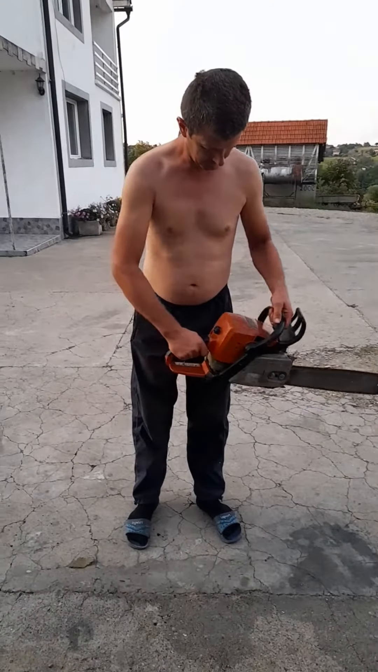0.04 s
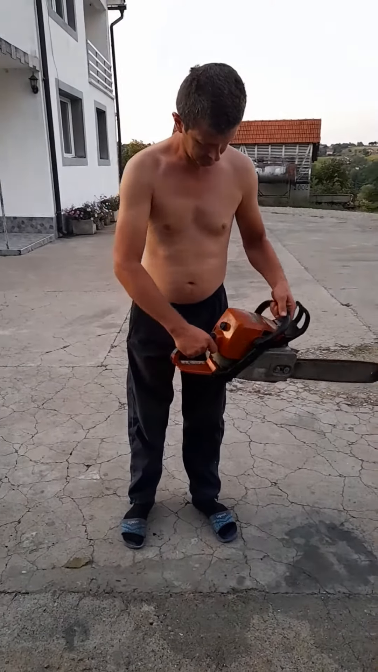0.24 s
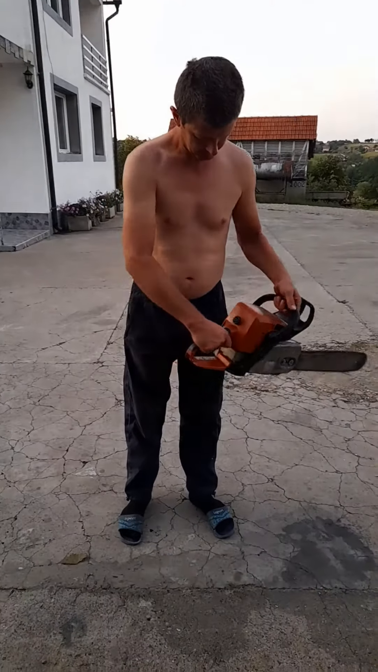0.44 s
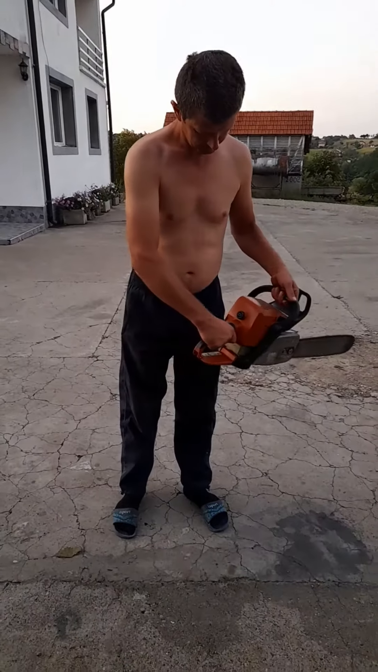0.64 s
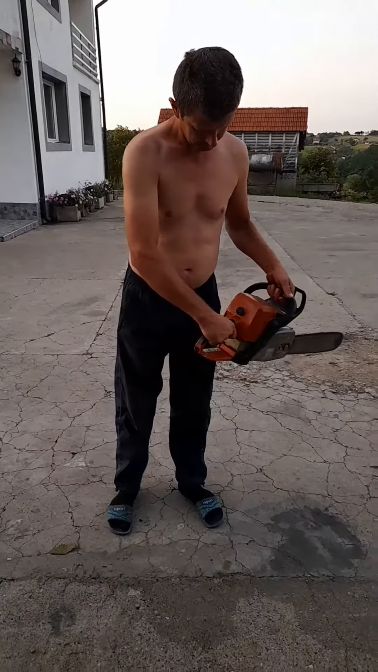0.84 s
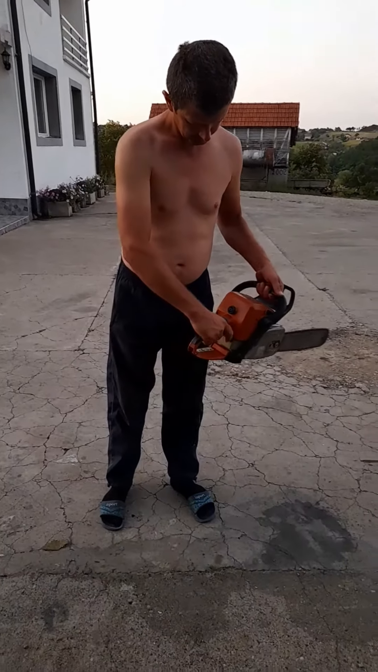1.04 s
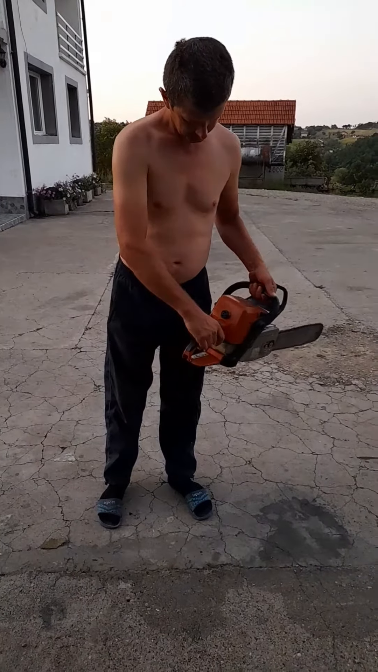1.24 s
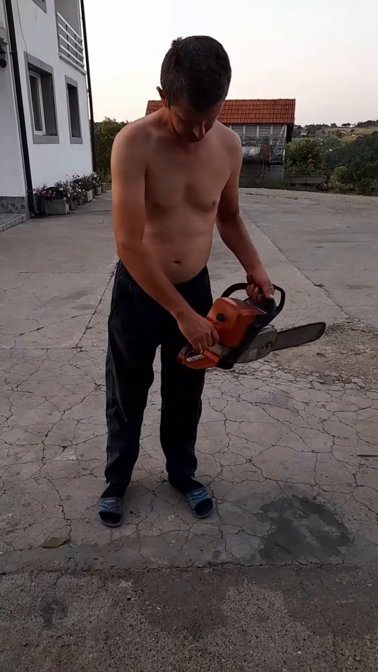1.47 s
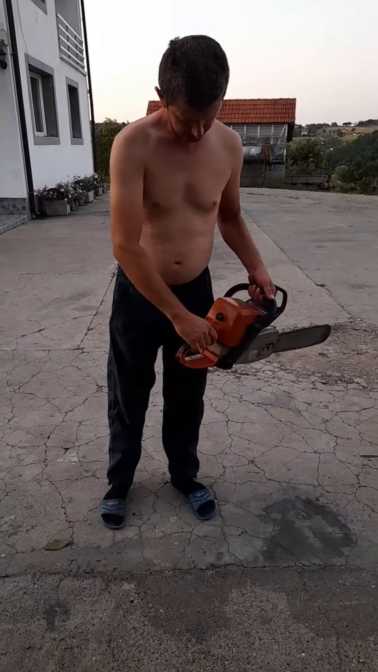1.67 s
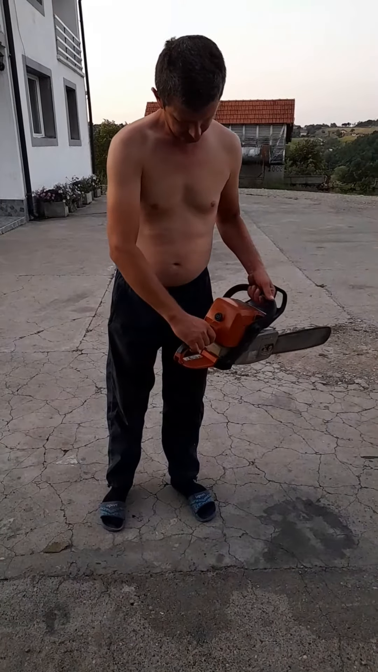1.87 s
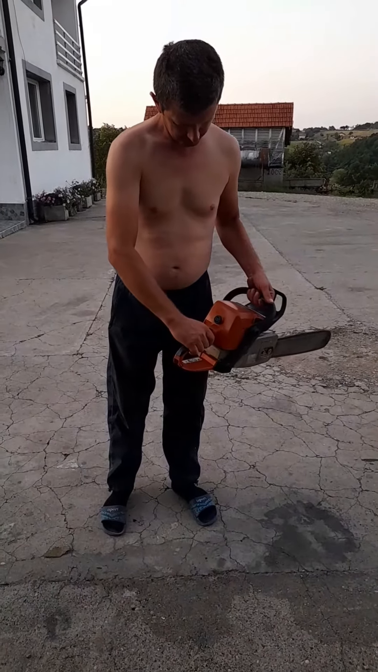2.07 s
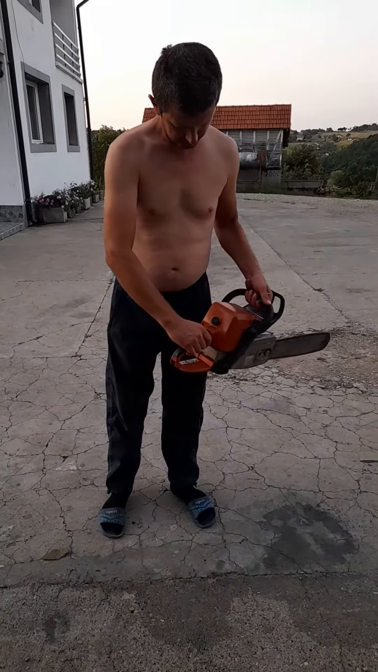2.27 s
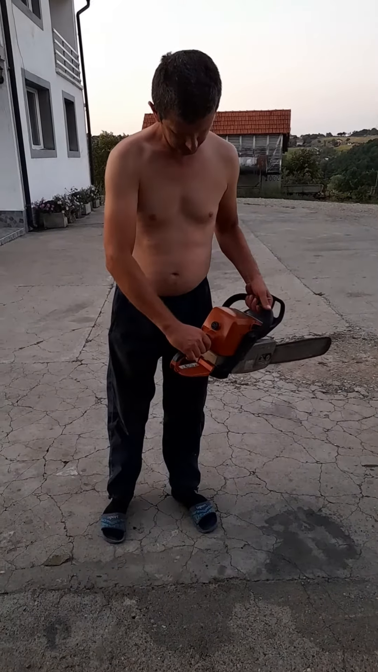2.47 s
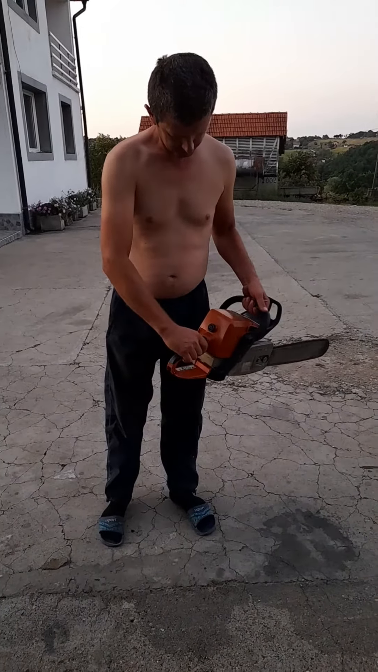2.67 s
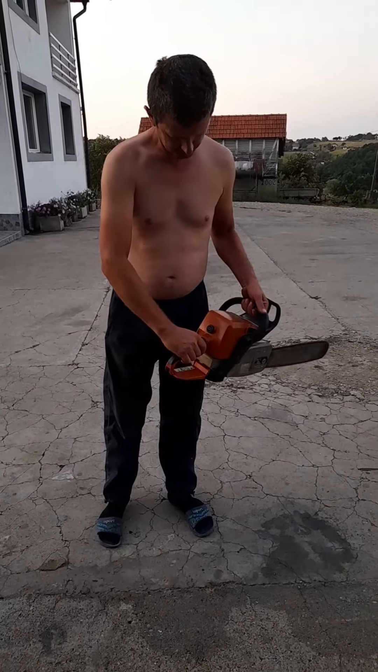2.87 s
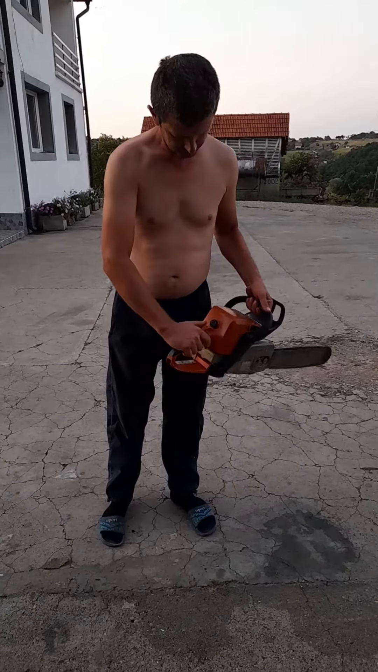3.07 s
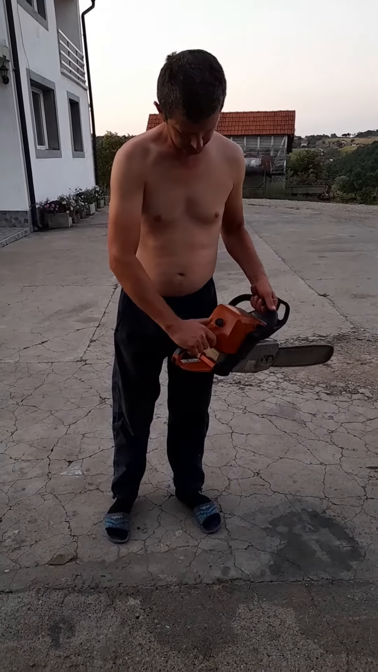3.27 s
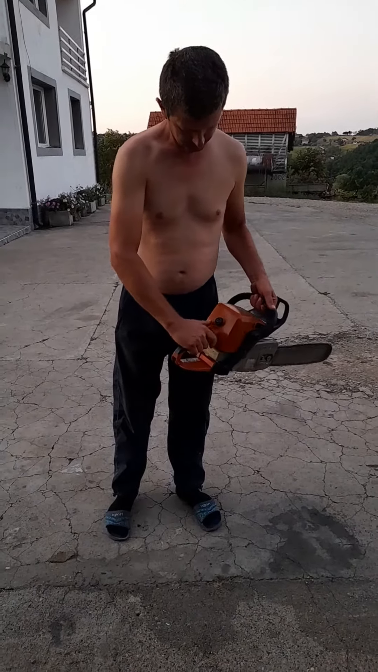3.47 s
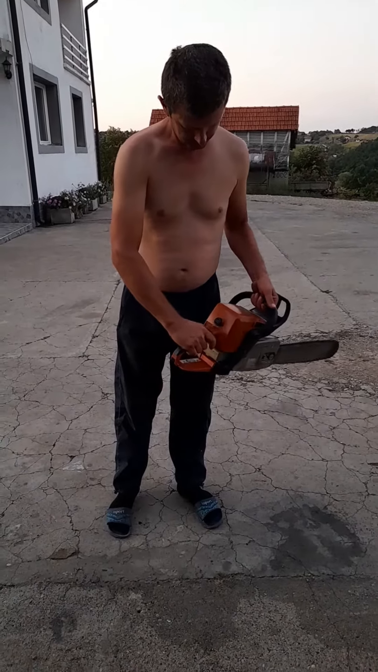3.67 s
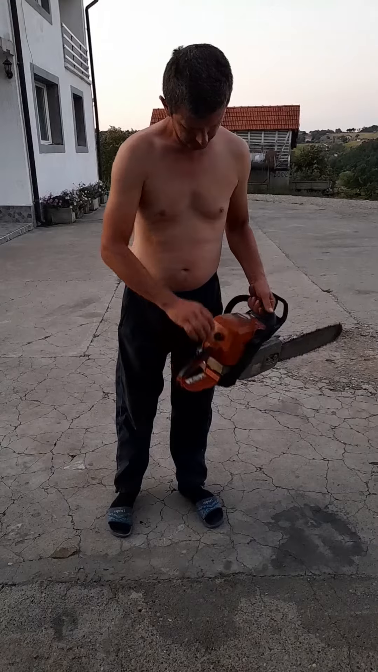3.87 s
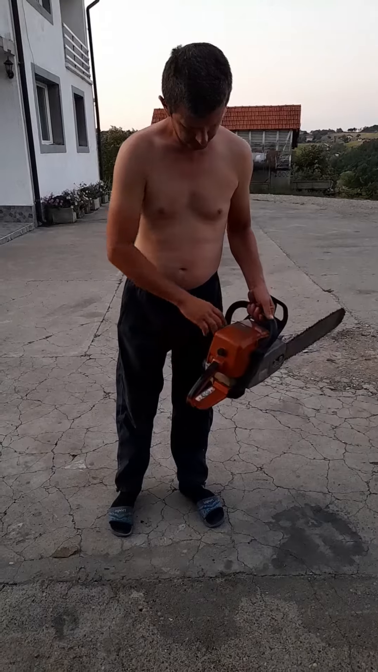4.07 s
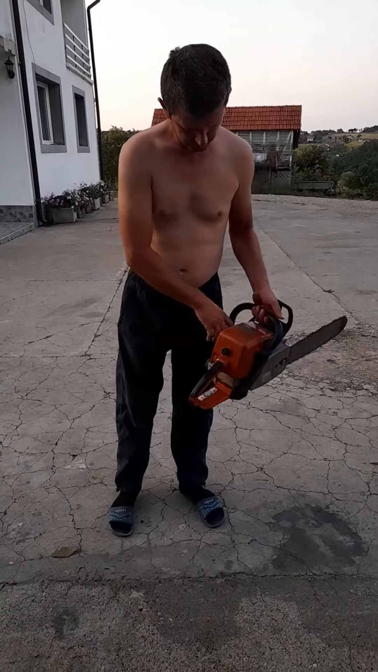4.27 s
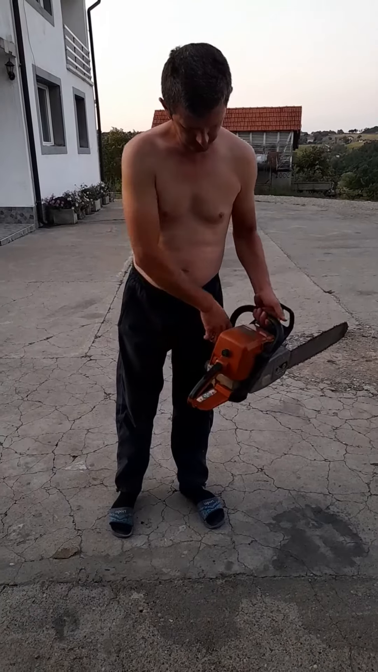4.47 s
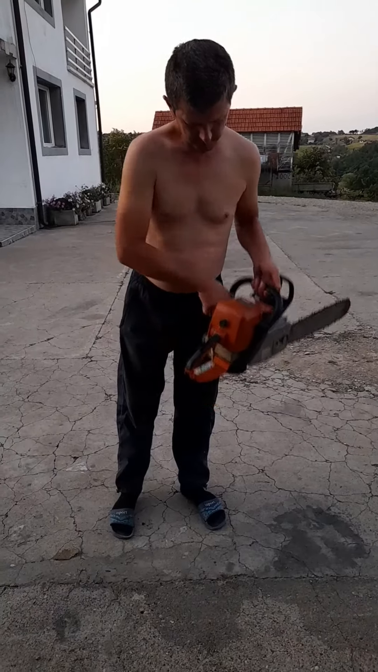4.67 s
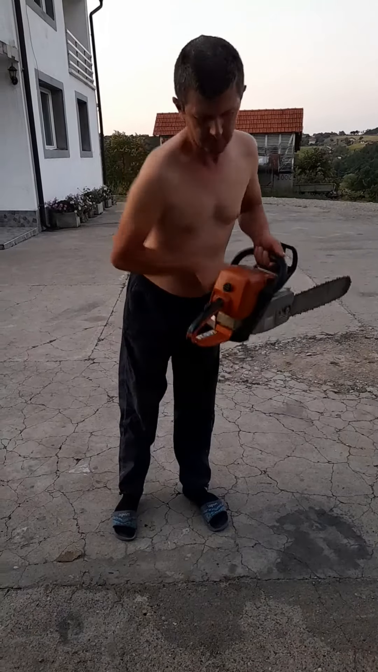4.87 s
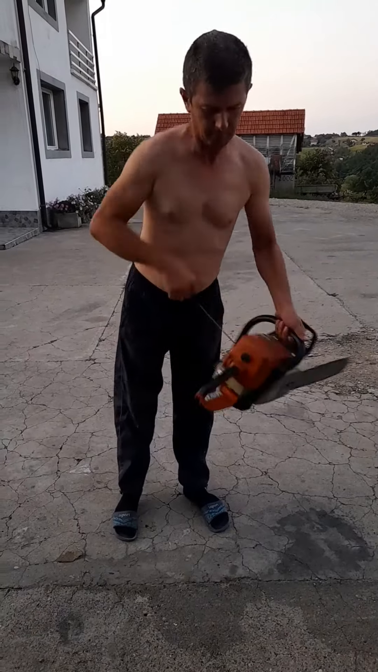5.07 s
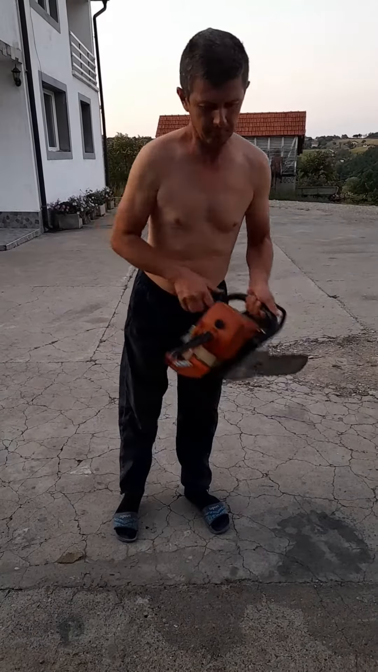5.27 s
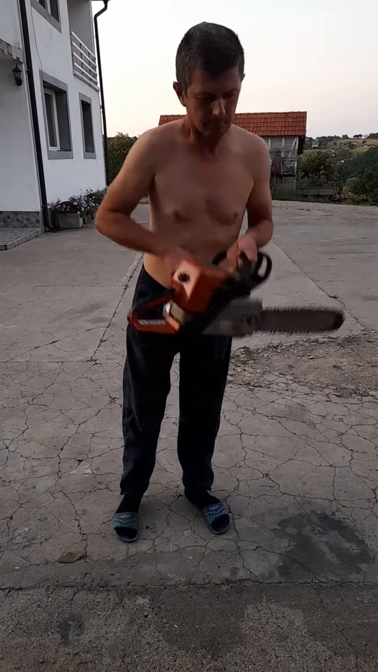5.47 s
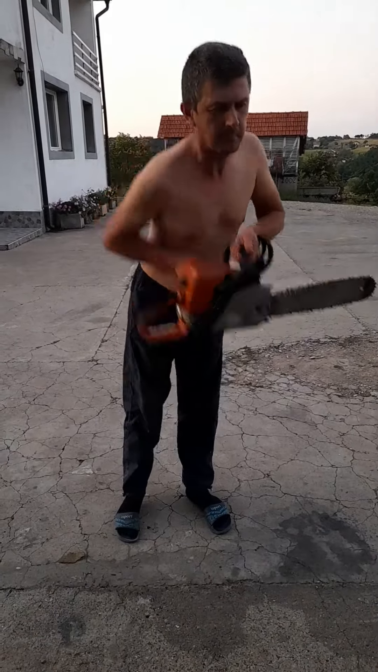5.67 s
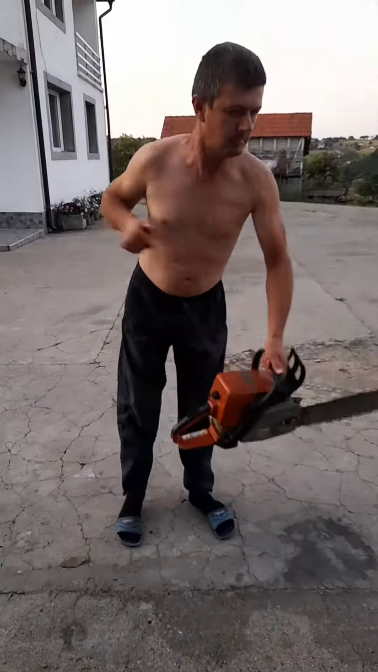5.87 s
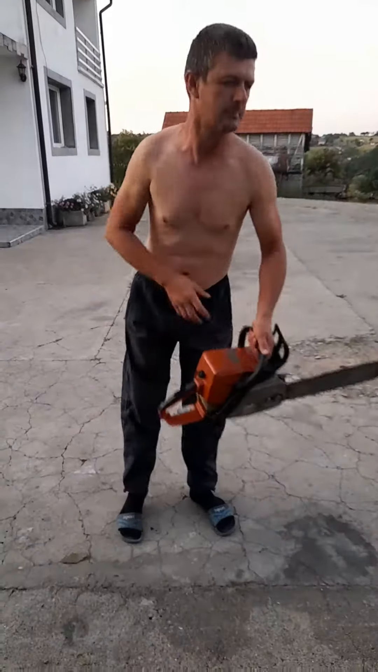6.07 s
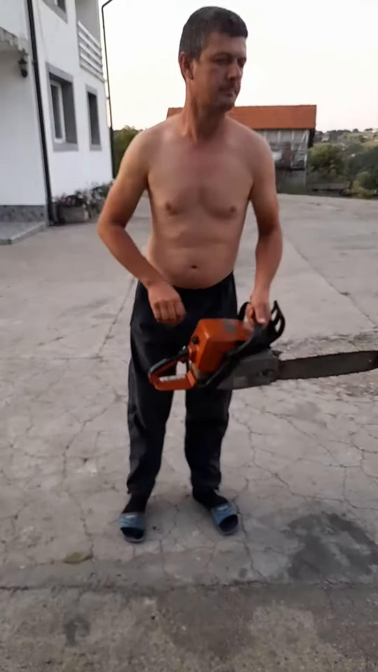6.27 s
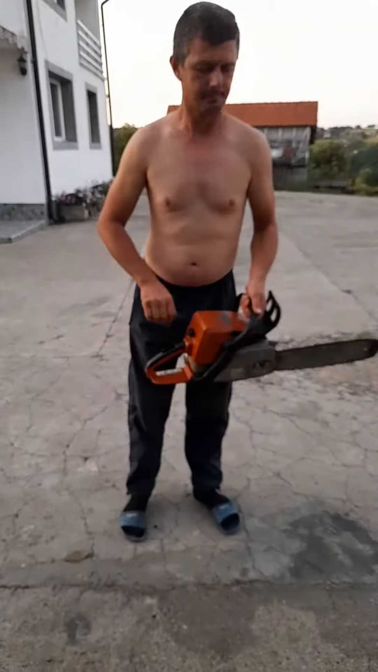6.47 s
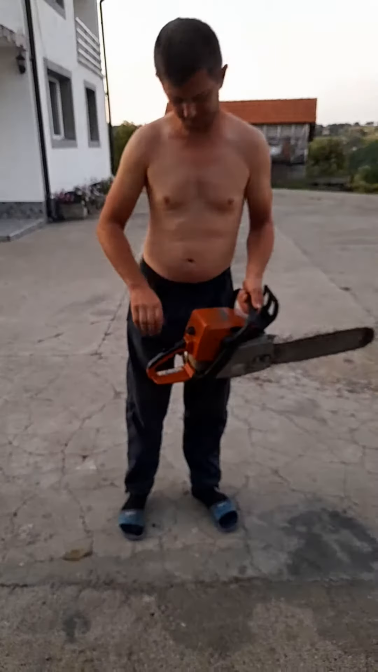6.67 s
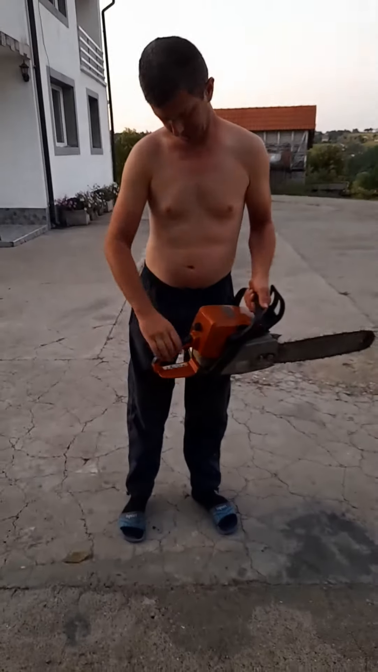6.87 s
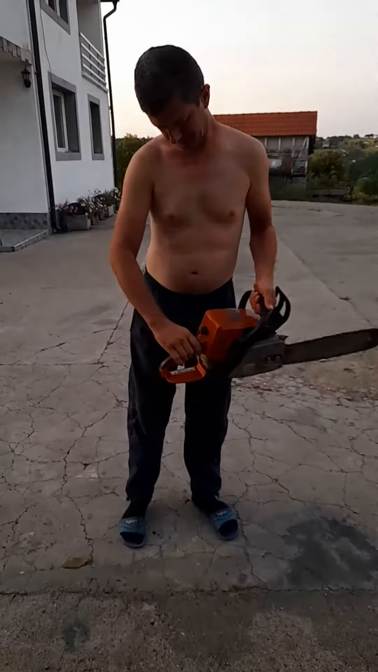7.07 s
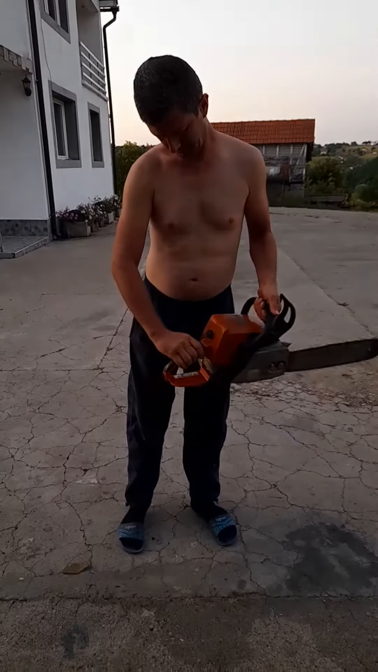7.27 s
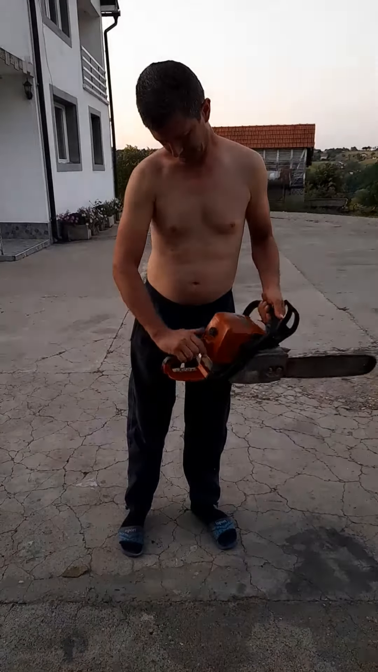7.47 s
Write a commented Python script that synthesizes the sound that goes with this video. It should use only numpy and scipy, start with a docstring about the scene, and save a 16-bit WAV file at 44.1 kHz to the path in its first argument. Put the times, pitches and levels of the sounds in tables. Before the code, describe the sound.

A small two-stroke chainsaw screams at high revs twice, sinks to idle and dies, then two cord pulls restart it into a lumpy idle.

```python
"""A small two-stroke chainsaw is revved twice in a concrete yard, sinks to idle and is switched off.
Knocks on the housing and two pulls of the starter cord follow; the engine catches and idles, burning every few turns.
Exhaust pulses, one a turn, ring muffler and housing; hiss, rattle and shake follow the crank.
Sparse echoes and a quiet yard lie behind it, heard through two microphone ports."""
import sys
import numpy as np
from scipy import signal
from scipy.fft import rfft, irfft
from scipy.io import wavfile
from scipy.ndimage import uniform_filter1d

SR = 44100
rng = np.random.default_rng(int(sys.argv[2]) if len(sys.argv) > 2 else 0)


def to_wav(s):
    """Save 16-bit WAV."""
    ch = np.atleast_2d(s).T  # columns
    pcm = np.round(np.clip(ch, -1, 1) * 32767)  # PCM
    wavfile.write(sys.argv[1], SR, pcm.astype(np.int16))


N = 331632
T = np.arange(N) / SR
WHITE = [(1, 0), (2, 0)]  # flat spectrum: [f/Hz, level/dB]

# strong strokes, burning at idle or as the crank runs out after switch-off:
# [t/s, thump level/dB, hiss burst level/dB (below 0 counts as 0)]
STROKES = [(2.297, -25.5, 0.5), (2.397, -33, 4), (2.5, -29.5, 5.5), (2.576, -28, 2), (2.716, -26.5, 2.5),
           (2.872, -23, 4.5), (2.974, -27, -1.5), (3.03, -26.5, -5.5), (3.285, -24.5, 6.5),
           (3.374, -23.5, -9), (3.492, -21.5, -10.5), (3.572, -26, 4), (5.881, -18, 8), (5.949, -26, 11),
           (6.027, -21.5, 9.5), (6.07, -30.5, 5), (6.096, -27, 2.5), (6.126, -17, 11.5), (6.246, -23, 11.5),
           (6.267, -32, 6.5), (6.354, -16, 2.5), (6.444, -22, 7), (6.532, -28, 3), (6.624, -21, 10),
           (6.734, -20, 8), (6.834, -18.5, 2.5), (6.88, -26.5, 6), (6.965, -19, 4), (7.09, -19, 8.5),
           (7.211, -21.5, 9.5), (7.314, -18, -8), (7.413, -21.5, 5)]
# muffler chambers: [f/Hz, width/Hz, relative level/dB in the first running, the same in the second]
MUFFLER = [(243.2, 100, 0, 2.5), (348, 154, 8.5, 2.5), (390, 216, 4, -6.5)]
# colour of the quiet yard, also lent to the cord's rumble: [f/Hz, relative level/dB per Hz]
YARD = [(18, -53), (30, -10), (252, -6), (473, -14.5), (866, -16), (1040, -19), (1250, -15), (1760, -25.5),
        (3770, -36.5), (5310, -27.5), (8300, -44.5), (14000, -32.5), (16000, -40.5)]


def gain_of(db):
    """Decibels to gain."""
    return 10 ** (np.asarray(db) / 20)


def evened(x, span_s=0.13):
    """Holds the running rms, shared by the channels, near 1."""
    power = uniform_filter1d(np.atleast_2d(x ** 2).mean(0), int(span_s * SR))
    return x / np.sqrt(abs(power) + 1e-12)


def read(points):
    """A spectrum table at every bin, interpolated over log frequency."""
    f, value = np.transpose(points)
    bins_hz = np.fft.rfftfreq(N, 1 / SR)
    return np.interp(np.log(bins_hz + 1), np.log(f + 1), value, left=value[0])


def noise(colour, same):
    """Two channels of coloured noise that share a part, with an overall rms of 1."""
    a, b = rng.standard_normal((2, N))
    same = np.clip(same, 0, 1)
    pair = [a, same * a + np.sqrt(1 - same ** 2) * b]
    x = irfft(rfft(pair) * gain_of(read(colour)), N)
    return x / x.std()


def ring(x, hz, width_hz):
    """A fixed resonance with a gain of 1 at its peak."""
    return signal.lfilter(*signal.iirpeak(hz, hz / width_hz, SR), x)


def curves(rows):
    """Columns over time, and a gate that is open inside the table."""
    s, *columns = np.transpose(rows)
    gate = uniform_filter1d(1. * ((T >= s[0]) & (T <= s[-1])), size=200)
    return [np.interp(T, s, c) for c in columns] + [gate]


def add(mix, s, sound):
    """Mixes a sound in at s."""
    part = mix[..., round(s * SR):][..., :sound.shape[-1]]
    part += sound[..., :part.shape[-1]]


def engine(speed, levels, opens_s, tick_db, turned_db, column):
    """Exhaust pulses, one a turn, ring muffler and housing; hiss, rattle and flutter follow the crank angle."""
    hz, turns, fast, luck = crank(speed, opens_s)
    engine_db, gate = curves(levels)
    throttle, judder_gain = trigger()
    muffler_db, buzz_db, shake_db, clutch_db, flutter_db = part_levels(hz, throttle, turned_db)
    turn = np.maximum.accumulate(turns.astype(int))
    chance = luck[turn].T

    strength = gain_of((2.2 - 1.6 * fast) * chance[1]) * np.clip(hz / 35, .3, 1)
    pulses = np.diff(turn, prepend=turn[0]) * strength
    grit = rng.standard_normal(N) * np.sqrt((hz + 4) / SR)
    swing_db = rattle_swing(turns, fast, luck, tick_db)

    body = gain_of(buzz_db + .5 * swing_db) * evened(housing(pulses, grit, hz, fast, throttle))
    body += gain_of(muffler_db) * evened(exhaust(pulses, grit, fast, column))
    body += gain_of(shake_db) * evened(shake(turns, grit, hz, fast))
    body += judder_gain * evened(ring(ring(grit, 52, 50), 47, 60))

    # colour of the gas hiss: [f/Hz, relative level/dB per Hz]
    hiss_colour = [(820, -8.5), (1400, -1.5), (1580, 0.5), (2060, -0.5), (3040, -2.5), (3400, -3),
                   (3880, -2.5), (5060, 4), (5540, -2), (7010, -5), (8420, -18), (11400, -4.5),
                   (13300, -7.5), (14900, -8), (16000, -10.5)]
    treble = gain_of(-1.0) * noise(hiss_colour, same=0.24)
    treble += gain_of(clutch_db) * evened(clutch(turn, hz, column), span_s=0.93)
    fluttering = gain_of(flutter_db) * evened(flutter(turns, fast, chance[2]))
    return gate * gain_of(engine_db) * (body + gain_of(swing_db) * treble + fluttering)


def crank(speed, opens_s):
    """The speed curve adds up to turns, set to a whole turn as the port opens; the slow crank is uneven."""
    s, turns_per_s = np.transpose(speed)
    hz = np.exp(np.interp(T, s, np.log(turns_per_s)))
    turns = np.cumsum(hz) / SR
    turns += 1000 - np.round(turns[round(opens_s * SR)], decimals=4)
    fast = np.clip(hz / 150, 0, 1)
    # chances of each turn: unevenness, pulse strength, flutter size and rattle delay, rattle size
    luck = rng.standard_normal((2000, 4))
    turns += .06 * (1 - fast) ** 2 * np.interp(turns, np.arange(2000), luck[:, 0])
    return hz, turns, fast, luck


def trigger():
    """Each pull moves the throttle flap over a short ramp and brings a low judder."""
    # trigger pulled: [from t/s, to t/s, low judder level/dB relative to the engine level]
    pull_table = [(-.1, 0.246, -16.5), (0.508, 1.03, -21.5)]
    flap_s = 0.022  # travel time of the flap
    pulls = np.array([np.clip(np.minimum(T - a, b - T) / flap_s + .5, 0, 1) for a, b, _ in pull_table])
    return pulls.sum(axis=0), gain_of(np.transpose(pull_table)[2]) @ pulls


def part_levels(hz, throttle, turned_db):
    """The parts follow the crank speed; open throttle and the way the saw is turned shift them."""
    # throttle shut: [speed/turns per s, then level/dB relative to the engine level before the
    # turning shift: muffler, housing buzz, shake, clutch ring, flutter]
    coasting = [(0, -8.5, -11.5, -8, -7, -10), (16.8, 0.5, -10.5, -5, -11, -19),
                (30.1, -8, -14, -7, -40, -9), (39.2, -5, -14.5, -7.5, -7, -12),
                (47.65, -2, -18.5, -12.5, 0.5, -13), (63.5, -1.5, -14.5, -11, -6.5, -25.5),
                (90, -5, -12.5, -13.5, -6, -37), (129.2, -8, -15, -16.5, -7, -21),
                (144, -10, -11, -14, -23, -16), (153.9, -8.5, -13.5, -15, -14.5, -3.5),
                (176.4, -7.5, -9, -12.5, -22.5, -9.5), (184.6, -10.5, -11.5, -11.5, -26.5, -25)]
    # what the open throttle adds: [level/dB of each part, in the same order]
    open_throttle_db = [11.5, 5, 4, 10, -1.5]
    at_hz, *parts = np.transpose(coasting)
    return [np.interp(hz, at_hz, db) + open_db * throttle + turn_db
            for db, open_db, turn_db in zip(parts, open_throttle_db, turned_db)]


def exhaust(pulses, grit, fast, column):
    """Pulses and grit, given a soft onset by two wide resonances at 330 Hz, ring the muffler chambers."""
    blow = ring(ring(pulses + (.3 - 0.16 * fast) * grit, 330, 280), 330, 280)
    return sum((-1) ** k * gain_of(mode[column]) * ring(blow, *mode[:2]) for k, mode in enumerate(MUFFLER))


def housing(pulses, grit, hz, fast, throttle):
    """Pulses and noise ring the housing, with a wide band of rough noise around 1.1 kHz."""
    # housing rings: [f/Hz, width/Hz, relative level/dB]
    housing_modes = [(560, 200, 3), (750, 110, 8), (935, 100, 4), (2060, 200, -5), (1290, 130, 3)]
    # wide band of rough noise: [f/Hz, width/Hz, relative level/dB]
    rough_band = (1120, 390, 3)
    bark = 1.5  # pulse drive added by the open throttle
    drive = (fast ** 2 + bark * throttle) * pulses
    drive = drive + (.7 - 0.063 * fast) * noise(WHITE, same=0.71) * np.sqrt(hz / SR)
    buzz = sum((-1) ** k * gain_of(db) * ring(drive, f, w) for k, (f, w, db) in enumerate(housing_modes))
    return buzz + gain_of(rough_band[2]) * ring(grit, *rough_band[:2])


def shake(turns, grit, hz, fast):
    """Crank unbalance gives a sine at the turning rate, with low rumble around it."""
    rumble = evened(ring(ring(grit, 91, 260), 150, 330) + 2.5 * fast ** 2 * ring(grit, 67, 70))
    unbalance = np.clip((hz - 30) / 50, .1, 1) * np.sin(2 * np.pi * turns)
    return unbalance + (.35 - .2 * fast) * rumble


def flutter(turns, fast, chance):
    """Waves at 7.8 times the crank rate in the first 0.6 of each turn; their pitch sinks with the crank."""
    angle = turns % 1
    uneven = gain_of(2.5 * (1 - fast) * chance)
    swell = np.sin(np.pi * np.clip(angle / .6, 0, 1)) ** 2
    return uneven * np.sin(2 * np.pi * 7.8 * angle) * swell


def rattle_swing(turns, fast, luck, tick_db):
    """The treble jumps up within each turn and dies away; strong strokes, burning or running out, add bursts."""
    burst_db = np.zeros(N)
    for s, _, db in STROKES:
        add(burst_db, s, max(db, 0) * np.exp(-np.arange(1500) / SR / 0.0081))
    ahead = turns + .25  # the rattle sets in a little before the port opens
    late, size = luck[ahead.astype(int), 2:4].T
    since = ahead % 1 - np.clip(.1 + .04 * late, 0, .4)  # in turns
    tick = (since > 0) * np.exp(-(since / .42) ** 2) * np.clip(1 + .25 * size, 0, 1.5)
    return tick_db * (1 - 1.1 * fast) * (tick - .4) + burst_db


def clutch(turn, hz, column):
    """Spiky noise rings clutch drum and chain, each mode unevenly from turn to turn."""
    # drum and chain: [f/Hz, width/Hz, relative level/dB in the first running, the same in the second
    # with the saw turned]
    clutch_modes = [(1760, 85, -18, -2), (2432, 140, -25, -1), (3470, 25, -8.5, -5), (5025, 240, 2.5, -2.5),
                    (6040, 56, -6.5, -15.5), (7060, 58, -4, -9), (9450, 150, -3, -7),
                    (11210, 60, 3.5, -7.5), (12400, 120, -4, -9.5), (12220, 140, -14.5, 3),
                    (12000, 70, 2, -30.5), (13600, 280, -2, -11)]
    spread_db = 4  # standard deviation from turn to turn
    luck_db = spread_db * rng.standard_normal((2000, len(clutch_modes)))
    rattle = noise(WHITE, same=.6) * gain_of(6 * rng.exponential(1, N).clip(0, 4))
    gripped_db = -12 * np.clip((hz - 60) / 20, 0, 1)  # at speed the shoes grip the drum and damp its ring
    out = np.zeros((2, N))
    for k, mode in enumerate(clutch_modes):
        f, width = mode[:2]
        drive_db = mode[column] + luck_db[turn, k] + gripped_db * (f > 6000)
        out += ring(rattle * gain_of(drive_db), f, width) / np.sqrt(width)
    return out


def thumps():
    """A strong stroke or a slow compression stroke pushes one low wave out."""
    # slow compression strokes: [t/s, level/dB]
    puffs = [(3.618, -32), (3.668, -35), (5.065, -38.5), (5.104, -19.5), (5.131, -19), (5.176, -24.5)]
    out, t = np.zeros(N), np.arange(3000) / SR
    for s, db, _ in STROKES:
        wave = np.sin(2 * np.pi * 85 * t) + 0.09 * np.sin(2 * np.pi * 150 * t)
        add(out, s, gain_of(db) * wave * t / 0.0056 * np.exp(1 - t / 0.0041))
    for s, db in puffs:
        wave = 0.58 * np.sin(2 * np.pi * 90 * t) + 0.38 * np.sin(2 * np.pi * MUFFLER[0][0] * t)
        add(out, s, gain_of(db) * wave * t / 0.0033 * np.exp(1 - t / 0.0048))
    return out


def cord():
    """The cord rasps through its guide and shakes the saw; each swell of noise rises and fades."""
    # swells of cord and handling noise: two pulls, a slow tail, handling between:
    # [peak t/s, whirr level/dB, rise/dB per s, fade/dB per s]
    swell_table = [(5.148, -23, 195, 203), (5.4, -57, 198, 47), (5.6, -60.5, 252, 197),
                   (5.75, -65, 102, 60), (5.836, -42, 900, 900)]
    # colour of the whirr: [f/Hz, relative level/dB per Hz]
    whirr_colour = [(290, -44), (500, -4.5), (578, -11), (1020, -0.5), (1160, -2.5), (2890, -14.5),
                    (6230, -12), (8090, -30.5), (14500, -16.5), (16000, -44)]
    rumble_db = -2  # shake of the saw over the whirr
    flicker_db = 2.0 * evened(uniform_filter1d(rng.standard_normal(N), size=300))
    whirr = noise(whirr_colour, same=0.46) * gain_of(flicker_db)
    rumble = evened(ring(noise(YARD, same=1.0), 323, 280))
    swells = sum(gain_of(db - np.maximum(rise * (s - T), fall * (T - s))) for s, db, rise, fall in swell_table)
    return swells * (whirr + gain_of(rumble_db) * rumble)


def knocks():
    """Each knock is a short plastic ring with a crack of noise; one spring rings as a fading sine."""
    # hands, switch and starter pawls on the housing: [t/s, level/dB, treble level/dB, t60/s]
    knock_table = [(3.676, -21, 5, 0.028), (3.82, -46, 9, .06), (4.043, -62, -10, .069),
                   (4.138, -58, -15.5, .06), (4.367, -49.5, -24, 0.21), (4.601, -47, -19, 0.075),
                   (4.955, -54, 2, 0.088), (4.988, -35.5, -3, .041), (5.041, -18.5, -9, 0.12),
                   (5.093, -13.5, -21, 0.062), (5.137, -10.5, -10, 0.089), (5.253, -35.5, -12, 0.26),
                   (5.371, -44, -14, .06), (5.406, -27.5, -18, 0.067), (5.433, -33, -20, 0.086),
                   (5.583, -46, -20, .06), (5.687, -40.5, -22, 0.048), (5.742, -45.5, 8.5, 0.083),
                   (5.765, -48, -31, .06), (5.818, -34, -9, .06), (5.842, -8.5, -4, 0.068),
                   (6.187, -4, -18, 0.0387)]
    # rings of the knocked housing: [f/Hz, width/Hz, relative level/dB]
    shell_modes = [(574, 160, 3), (934, 350, 15), (1190, 650, 7), (1640, 640, 4.5)]
    # a spring rings: [t/s, level/dB, f/Hz, t60/s]
    spring = (5.692, -52, 3750, .12)
    out, t = np.zeros((2, N)), np.arange(6000) / SR
    for s, db, treble_db, t60 in knock_table:
        grain = rng.standard_normal((3, len(t)))
        grain = 0.27 * grain[1:] + 0.38 * grain[0]  # two channels with a shared part
        tone = sum(gain_of(mode_db) * ring(grain, hz, w) for hz, w, mode_db in shell_modes)
        crack = gain_of(treble_db) * (grain - ring(grain, 800, 2900))
        shape = np.minimum(t / .0015, 1) * gain_of(db - 60 * t / max(t60, .01))
        add(out, s, shape * (tone + crack))
    s, db, hz, t60 = spring
    add(out, s, gain_of(db - 60 * t / t60) * np.sin(2 * np.pi * hz * t))
    return out


def walls(x):
    """Sparse random echoes, fading 60 dB in 0.18 s, from the concrete and the house front."""
    t = np.arange(12000) / SR
    signs = rng.choice([-1., 1.], (2, len(t)))
    sparse = (rng.random((2, len(t))) < .04) * (t > .004)
    taps = signs * sparse * gain_of(-60 * t / 0.18)
    return signal.fftconvolve(x, taps / np.linalg.norm(taps[0]), axes=1)[:, :N]


def yard():
    """Quiet coloured noise of the yard, its level flickering slowly."""
    flicker_db = 2.0 * evened(uniform_filter1d(rng.standard_normal(N), size=2000), span_s=1.5)
    return gain_of(-64 + flicker_db) * noise(YARD, same=0.46)


def scene():
    """The saw in its two runnings, its echoes and the quiet yard."""
    # crank speed, one table a running: [t/s, speed/turns per s]
    speeds = [
        [(0, 187), (.12, 184), (.25, 186.6), (.35, 166.5), (.5, 144.3), (.56, 149.2), (.63, 168.8), (.7, 182.5),
         (.8, 186.6), (1.03, 188.5), (1.12, 171), (1.5, 124), (1.8, 92.7), (2.4, 58.2), (2.62, 51), (2.9, 50),
         (3.1, 46.4), (3.2, 38), (3.3, 27.6), (3.4, 17.4), (3.5, 15), (3.6, 9.8), (3.63, .5)],
        [(5.88, 19), (5.96, 42.5), (6.04, 37.3), (6.12, 40.5), (6.3, 45.1), (6.6, 44.4), (6.7, 47.7),
         (6.8, 46.4), (7.1, 49.1), (7.3, 49.1), (7.4, 47.9), (7.52, 52.7)],
    ]
    # overall level of the engine as heard, to which its parts are set, one table a running: [t/s, level/dB]
    levels = [
        [(0, -19), (.25, -17), (.4, -19), (.8, -18.5), (1.05, -18.5), (1.3, -20.5), (2, -29.5), (2.3, -29.5),
         (2.8, -25.5), (3.1, -23.5), (3.3, -28.5), (3.5, -39.5), (3.65, -41), (3.83, -52), (3.88, -74),
         (3.95, -100)],
        [(5.84, -39), (5.92, -23), (7.52, -23)],
    ]
    # one moment in each running at which the exhaust port opens: [t/s]
    port_opens_s = [3.4315, 6.151]
    # depth of the rattle within a turn, fading out with speed, one value a running: [level/dB]
    tick_depths = [6.5, 10]
    # shift of each part with the way the saw is turned, one row a running:
    # [level/dB of muffler, housing buzz, shake, clutch ring, flutter]
    turned_rows = [
        [0, 2.5, -2.5, -0.76, -1],
        [2, 8, 2.5, -2.2, -7],
    ]
    level_columns = (2, 3)  # of the muffler and clutch tables
    saw = sum(map(engine, speeds, levels, port_opens_s, tick_depths, turned_rows, level_columns))
    saw += thumps() + knocks() + cord()
    echo = gain_of(-13) * walls(saw - ring(saw, 150, 400))  # the walls return little bass
    return saw + echo + yard()


def record(dry):
    """Two microphone ports that differ in colour and timing and lose the deep bass; then the band limit."""
    # port colour: [f/Hz, left over right level/dB]
    lean = [(60, -3), (110, -1), (200, 1), (380, -6), (700, 3), (1290, -4), (2380, -1.5), (4400, -2),
            (8120, -2), (15000, -3.5)]
    # port timing: [f/Hz, phase by which left leads/rad]
    lead = [(0, 0), (700, .1), (950, -1), (2330, 6.8), (2930, 7.7), (4900, 4.3), (6300, 14.8), (8400, 10.2),
            (9900, 6.7), (14000, 0)]
    bass_cut_hz, edge_hz = 74.4, 16000
    half = gain_of(read(lean) / 2) * np.exp(.5j * read(lead))
    ports = irfft(rfft(dry) * [half, 1 / half], N)
    ports = signal.lfilter(*signal.butter(3, bass_cut_hz, "high", fs=SR), ports)
    band = signal.firwin(511, edge_hz, window=("kaiser", 9), fs=SR)
    return signal.oaconvolve(ports, band[None], "same")


dry = scene()
out = record(dry)
to_wav(out)
```